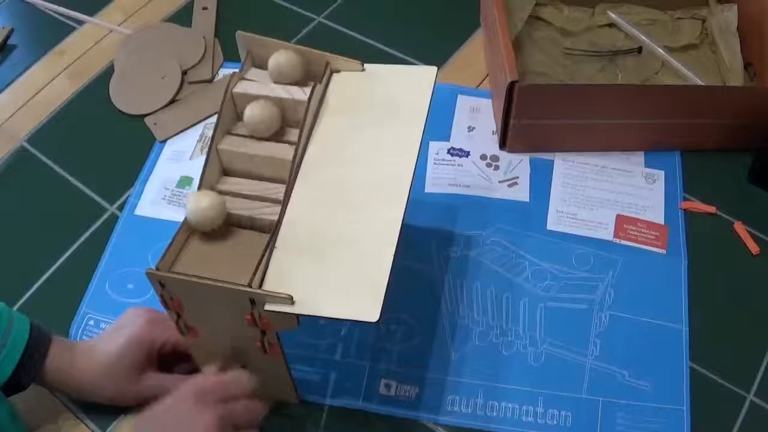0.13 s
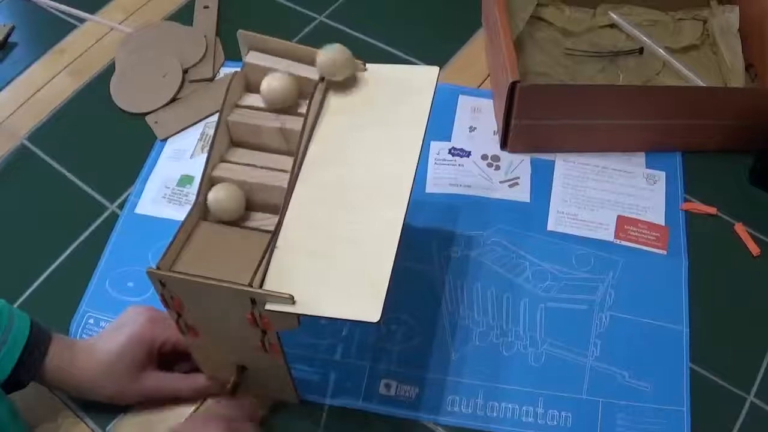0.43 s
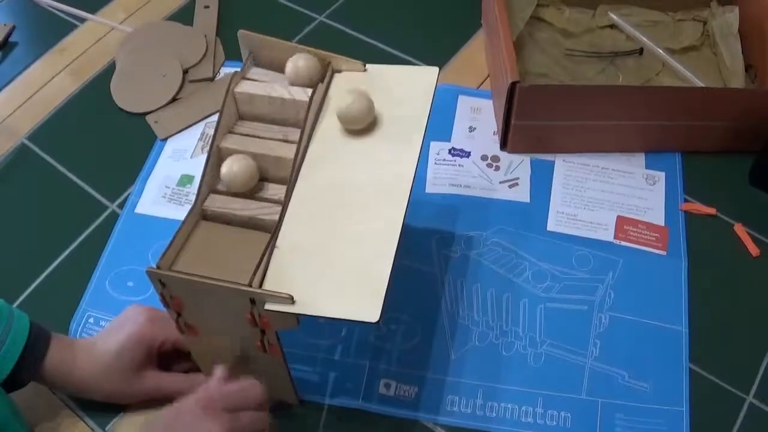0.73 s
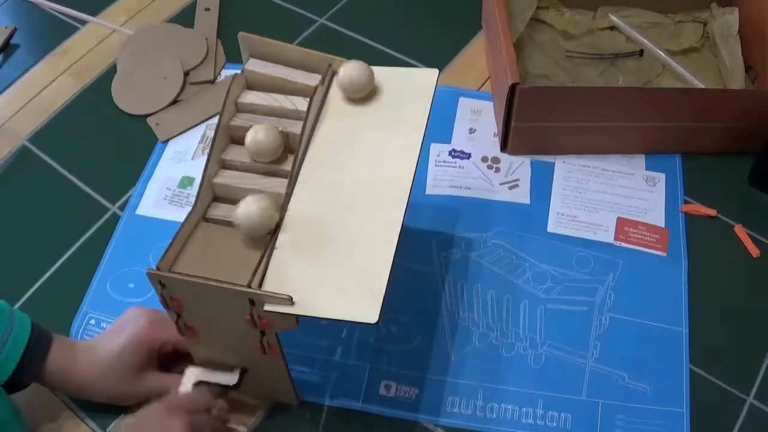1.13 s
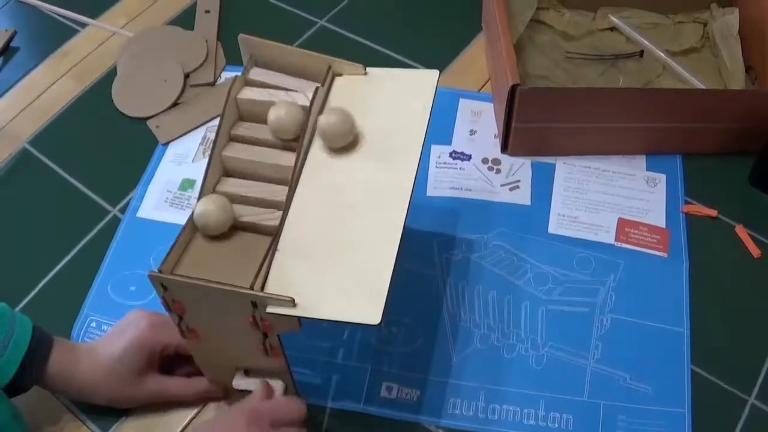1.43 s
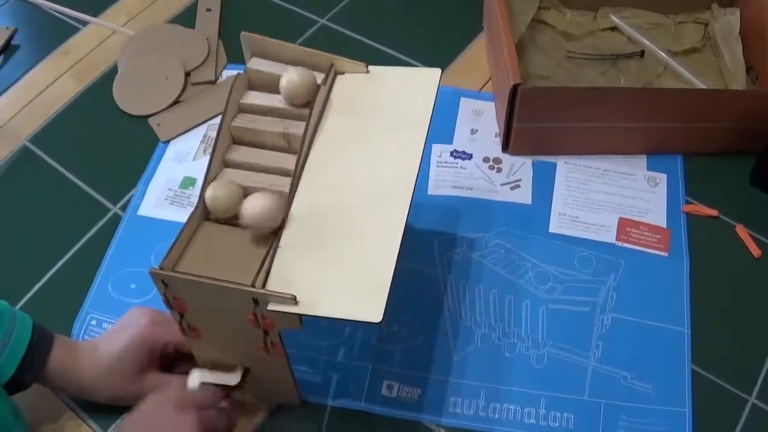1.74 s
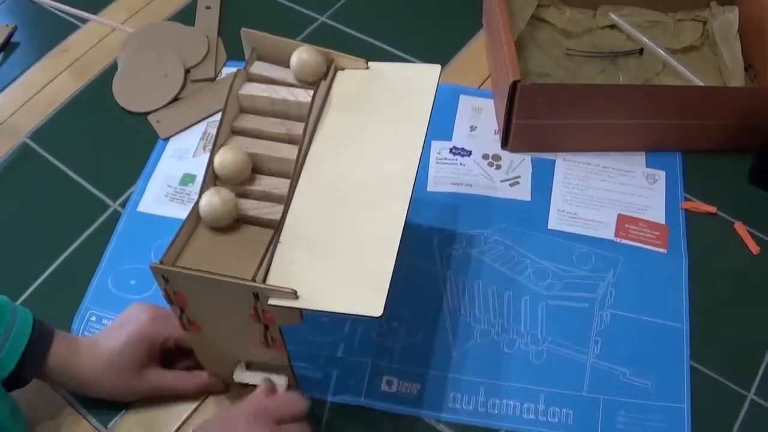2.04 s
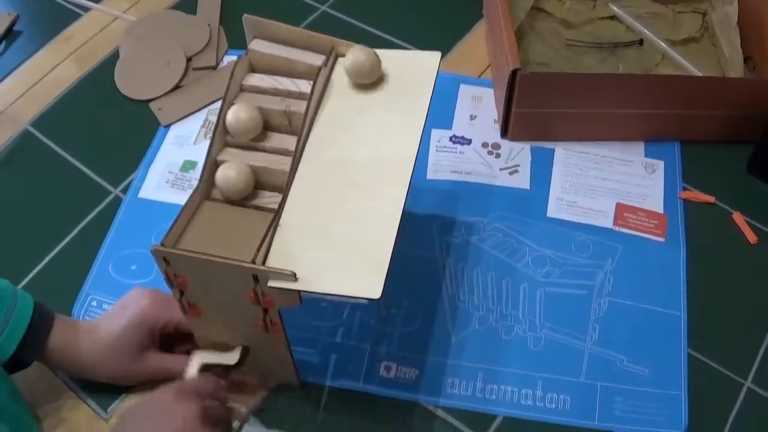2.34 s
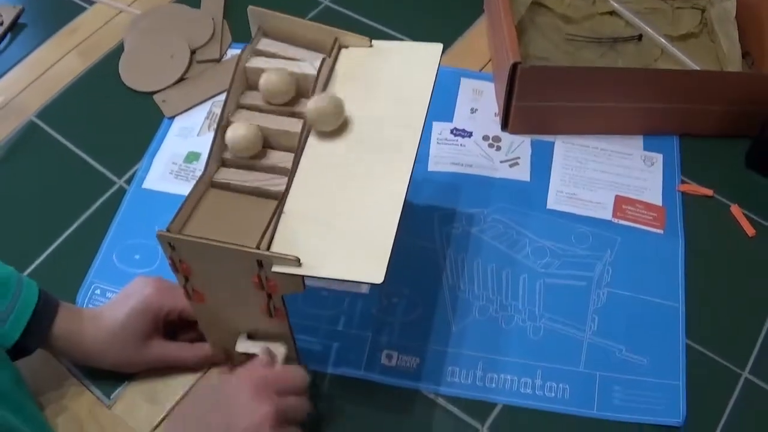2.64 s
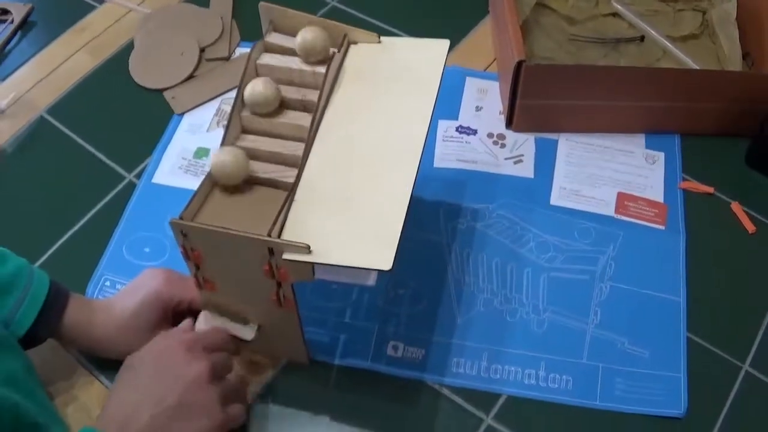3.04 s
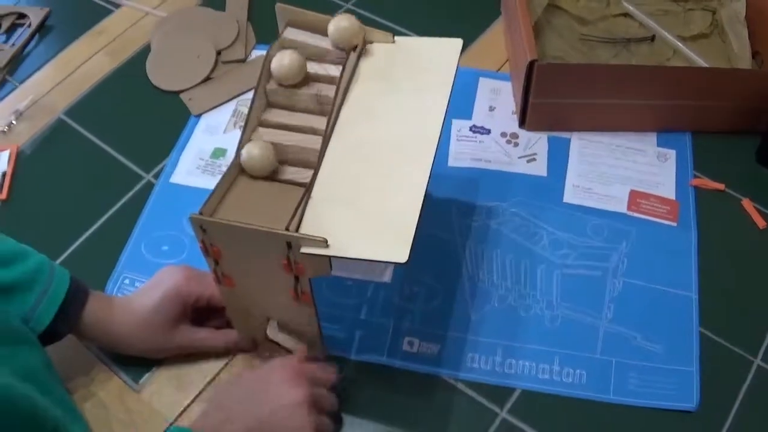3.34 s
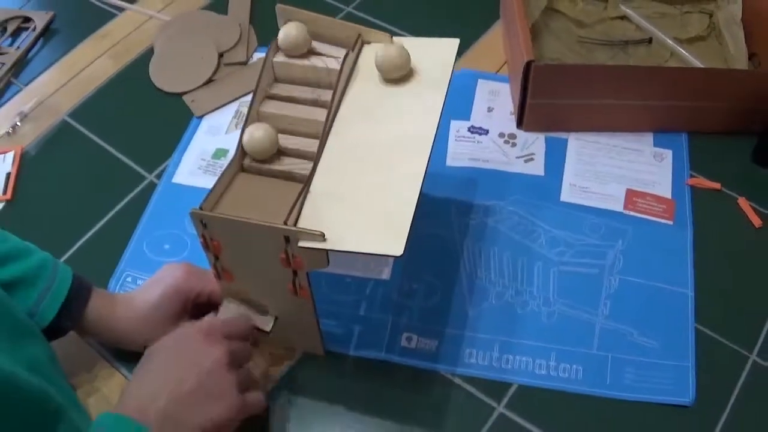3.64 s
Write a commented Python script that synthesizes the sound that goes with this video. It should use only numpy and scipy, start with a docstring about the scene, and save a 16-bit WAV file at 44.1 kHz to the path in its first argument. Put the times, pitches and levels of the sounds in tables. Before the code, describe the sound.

Hand-cranked wooden toy clatters close by, balls thudding and steps dropping in a quiet room

```python
"""Hand-cranked wooden ball stair

A plywood ball stair in a quiet room, heard from close by: balls bounce on a hollow ramp, steps drop
on their cams, balls clack against the frame and a peg ticks. Each blow sets damped sine modes ringing,
with noise for most contacts. Random taps make the rolling and rattles; the crank squeaks in thin glides.
A short noise wash gives the room, over banded stereo hiss, a low wavering hum and narrow drones."""
import sys
import numpy as np
from scipy import signal
from scipy.io import wavfile

SR = 44100
rng = np.random.default_rng(int(sys.argv[2]) if len(sys.argv) > 2 else 0)


def dump_mix(stems):
    """Bounce the given channels to the path in sys.argv[1] as a 16-bit WAV at rate SR."""
    frames = np.atleast_2d(stems).T  # one column per channel
    limited = np.clip(frames, -1, 1)  # hard clip at full scale
    pcm = np.round(limited * 32767).astype(np.int16)
    wavfile.write(sys.argv[1], SR, pcm)


N = 166698
FRAME_CRACK_HZ = 4170  # low edge of the contact noise of clacks and ticks

# Rolling and rubbing of balls and cams through the body: (time [s], level [dB])
ROLL_LEVEL = [(0.28, -44), (0.84, -43.5), (1.18, -42), (1.3, -35.5), (1.39, -35.5), (1.55, -42),
              (1.82, -38.5), (1.96, -33.5), (2.32, -44.5), (2.59, -40.5), (2.96, -37), (3.08, -30.5),
              (3.27, -39.5), (3.78, -38.5)]


def from_db(db):
    """Turn dB into gain."""
    return 10 ** (np.asarray(db) / 20)


def rms_one(x):
    """Scale to rms 1."""
    return x / np.sqrt(np.mean(x ** 2) + 1e-20)


def in_time(rows):
    """Read a level curve at every sample, straight in dB between its points."""
    s, db = np.transpose(rows)
    return np.interp(np.arange(N) / SR, s, db)


def at_hz(points, hz):
    """Read a spectrum on a log frequency axis."""
    point_hz, values = np.transpose(points)
    return np.interp(np.log(hz), np.log(point_hz), values)


def high_pass(x, order, hz):
    """Take away what lies below hz."""
    return signal.sosfilt(signal.butter(order, hz, "high", fs=SR, output="sos"), x)


def drift(rate_hz):
    """Slow random wander of spread 1: twice-smoothed noise, one point every 40 samples."""
    step, warm_up = 40, 2000
    r = np.exp(-2 * np.pi * rate_hz * step / SR)
    noise = rng.standard_normal(N // step + warm_up + 2)
    slow = signal.lfilter([1], [1, -2 * r, r * r], noise)[warm_up:]
    return np.interp(np.arange(N) / step, np.arange(len(slow)), rms_one(slow))


def decay_per_sample(t60):
    """Gain from one sample to the next that falls 60 dB in t60 seconds."""
    return from_db(-60 / (t60 * SR))


def dying(clicks, t60):
    """Each click starts an envelope at its own height that dies away."""
    return signal.lfilter([1], [1, -decay_per_sample(t60)], clicks + 1e-18)


def ring(clicks, hz, t60):
    """A damped resonance: a unit click sets a sine of height 1 ringing."""
    r, w = decay_per_sample(t60), 2 * np.pi * hz / SR
    return signal.lfilter([0, np.sin(w)], [1, -2 * r * np.cos(w), r * r], clicks + 1e-18)


def clicks_at(s, db):
    """Place one single-sample click per blow."""
    out = np.zeros(N)
    index = np.minimum((np.asarray(s) * SR).astype(int), N - 1)
    np.add.at(out, index, from_db(db))
    return out


def strike(s, db, modes, colour_db=lambda hz: 0):
    """Every blow, a click and a dying chatter of smaller contacts, rings each mode at its own strength."""
    spread_db, chatter_db, chatter_cycles = 1.5, -11, 16
    spread = spread_db * rng.standard_normal((len(s), len(modes)))
    out = np.zeros(N)
    for k, (hz, level_db, t60) in enumerate(modes):
        clicks = clicks_at(s, db + level_db + colour_db(hz) + spread[:, k])
        # chatter lasts a number of cycles, so low modes are fed for longer
        chatter_t60 = chatter_cycles / hz
        even_energy = np.sqrt(1 - decay_per_sample(chatter_t60) ** 2)
        chatter = even_energy * dying(clicks, chatter_t60) * rng.standard_normal(N)
        sign = -(-1) ** k  # neighbouring modes start in opposite directions
        out += sign * ring(clicks + from_db(chatter_db) * chatter, hz, t60)
    return out


def crack(s, db, low_hz):
    """The contact itself: treble noise that falls 60 dB in 12 ms."""
    return dying(clicks_at(s, db), 0.012) * high_pass(rng.standard_normal(N), 2, low_hz)


def bounces():
    """Balls bounce on the ramp: hollow thuds of its modes with a crack of contact noise."""
    # Ball bounces: (time [s], blow level [dB], crack over blow [dB])
    bounce_rows = [(0.1062, -4, -8.5), (0.1338, -14, -10), (0.2104, -11.5, -9), (0.2435, -14, -3),
                   (0.272, -17, -7), (1.2134, -1, -8.5), (1.2845, -3, -8), (1.366, -7.5, -3),
                   (1.4573, -13, -2.5), (1.4797, -14, -3.5), (1.5, -15, -5), (1.5186, -10.5, -22),
                   (1.7806, -7.5, -11), (1.8182, -0.5, -6.5), (1.8913, -3.5, -5.5), (1.9554, -11.5, -5),
                   (2.003, -5.5, -6.5), (2.0391, -9, -6), (2.0691, -13, -5), (2.0972, -12, -13),
                   (2.122, -12.5, -11), (2.9368, 2, -8), (3.0119, -3.5, -4.5), (3.0264, -4, -4.5),
                   (3.0737, -11, -7), (3.1262, -10.5, -4.5), (3.2423, -26, 7.5)]
    # Resonances of the hollow ramp: (frequency [Hz], level [dB], t60 [s])
    ramp_modes = [(348, -7.5, 0.014), (460, -23, 0.15), (508, -19, 0.14), (654, -4.5, 0.013),
                  (747, -10.5, 0.03), (873, -2, 0.023), (981, -1, 0.011), (1287, -11, 0.016),
                  (1796, -2.5, 0.01), (1987, -4.5, 0.012), (2970, -10, 0.0067)]
    ring_db, crack_low_hz = -7.5, 7560
    s, db, crack_db = np.transpose(bounce_rows)
    return strike(s, db + ring_db, ramp_modes) + crack(s, db + crack_db, crack_low_hz)


def drops():
    """Steps drop on their cams and rebound; the modes ring and are broken up by a shake on the guides."""
    # Step drops: (time [s], blow level [dB], crack and high modes [dB], low modes [dB])
    drop_rows = [(0.5096, -4.5, -5, 1.3), (.526, -11.5, -27, 8), (1.1238, -3, -6.5, 0.1),
                 (1.1484, -10, -12.5, 6), (1.173, -17.5, -11, 14), (1.532, -11.5, -28, 1),
                 (1.546, -10.5, -29, -12), (2.294, -2.5, -6.5, -1.5), (2.3113, -6, -16, 5.2),
                 (2.348, -16, -17, 4), (2.7, -9.5, -18, -17), (3.5069, -5, -4, 1), (3.525, -10, -22, 10),
                 (3.5434, -16.5, -10, 14.5)]
    # Resonances of the steps: (frequency [Hz], level [dB], t60 [s])
    step_modes = [(480.3, -14.5, .09), (518, -19.5, 0.031), (999, -13.5, 0.062), (1664, -4, 0.017),
                  (1738, -2, 0.027), (2087, -11, 0.032), (2519, -7.5, 0.023), (3030, -4.5, 0.016),
                  (4097, -1.5, 0.0077), (5067, 1, 0.0066), (6185, -4, 0.014)]
    ring_db, crack_low_hz = -6, 3770
    low_top_hz, high_from_hz = 1300, 2800
    taps_per_s, shake_t60_s, shake_db, bright_db = 600, 0.1, -8, 5.5
    s, db, crack_db, low_db = np.transpose(drop_rows)

    def colour_db(hz):
        """Set low modes by the blow; high modes need a hard contact."""
        if hz < low_top_hz:
            return low_db
        return crack_db if hz > high_from_hz else 0

    shake = dying(clicks_at(s, db + ring_db + shake_db), shake_t60_s)
    taps = shake * (rng.random(N) < taps_per_s / SR)
    rattle = np.zeros(N)
    for hz, level_db, t60 in step_modes:
        if hz < high_from_hz:
            rattle += ring(from_db(level_db) * taps * rng.standard_normal(N), hz, t60)
    # differencing leaves the treble of the bare taps
    bright = from_db(bright_db) * signal.lfilter([1, -1], [1], taps * rng.standard_normal(N))
    blows = strike(s, db + ring_db, step_modes, colour_db)
    return blows + crack(s, db + crack_db, crack_low_hz) + rattle + bright


def clacks():
    """Balls clack against the frame: short dry knocks, modes falling off from each knock's brightest pitch."""
    # Ball clacks: (time [s], blow level [dB], brightest pitch [Hz], thud over blow [dB], crack over blow [dB])
    clack_rows = [(0.1525, -20.5, 2740, -3, -13), (0.1672, -7, 2020, -6.5, -5),
                  (0.1823, -20, 2140, -1, -19), (0.2192, -16.5, 1180, -4, -29),
                  (0.319, -26.5, 1720, 2.5, -29), (0.3996, -27.5, 1380, 0, 2.5),
                  (0.497, -21, 1890, -19, -11), (0.744, -16, 2730, -38, -10),
                  (0.7558, -11.5, 2740, -1, 1.5), (0.7646, -12, 3050, -37, -20),
                  (0.786, -26, 1360, -10, -15), (0.8096, -33, 2240, -5, -13), (0.852, -24, 2440, 0, -26),
                  (0.9008, -14.5, 1980, -7, -30), (0.9174, -17, 1680, 0, -22),
                  (0.9339, -20.5, 1810, 0.5, -7.5), (1.0629, -18, 2360, -25, -10.5),
                  (1.3147, -15, 1170, 1, 2), (1.352, -15, 2250, -20, -12), (1.389, -30, 2180, 7, -16),
                  (1.4114, -25, 2600, 3, -26), (1.5871, -19, 3940, -5, -5.5),
                  (1.6906, -12, 2000, -30, -9.5), (1.9007, -25, 2730, -1, -2),
                  (1.9088, -14, 2100, -0.5, -3), (1.9229, -12, 2500, -1, 2.5),
                  (1.9758, -15, 2280, -10, -28), (2.2824, -29, 2300, -9, -17), (2.5452, -34, 1360, -16, -6),
                  (2.569, -11, 2850, -28, -35), (2.594, -32, 2640, -11, -12), (2.6112, -17, 1900, -23, -24),
                  (2.6176, -24.5, 2230, 8, -22), (2.678, -17, 1710, 3, -21), (2.698, -8, 2370, -0.5, -10),
                  (2.8946, -10.5, 2950, -2.5, -10.5), (2.9071, -36.5, 3140, 20, -16),
                  (3.1025, -13, 2400, -18, -16), (3.1411, -15.5, 2800, -23, 9.5),
                  (3.1583, -8.5, 2600, -5, -2), (3.1995, -16.5, 2170, -1.5, -9),
                  (3.2275, -20, 1820, 2, -23), (3.7458, -23, 1630, 0, -22), (3.7699, -8, 2020, -21, -5.5)]
    # Upper resonances of the frame: (frequency [Hz], level [dB], t60 [s])
    knock_modes = [(1380, 7.5, 0.011), (1720, 2.6, 0.02), (1930, 5.7, 0.015), (2280, 6.2, 0.009),
                   (2546, 2.5, 0.02), (2937, 6.4, 0.0068), (3250, 0.7, 0.027), (3705, 9, 0.0056),
                   (4470, -4, 0.015)]
    # Low resonances of the frame: (frequency [Hz], level [dB], t60 [s])
    thud_modes = [(335, -12, 0.029), (628, -2.5, 0.045), (840, -7.5, 0.058), (1076, -5.5, 0.042)]
    ring_db, thud_ring_db, fall_db_per_octave = -8, -8, 10
    s, db, bright_hz, thud_db, crack_db = np.transpose(clack_rows)

    def colour_db(hz):
        """Weaken a mode by its distance in octaves from the brightest pitch."""
        return -fall_db_per_octave * np.abs(np.log2(hz / bright_hz))

    knocks = strike(s, db + ring_db, knock_modes, colour_db)
    thuds = strike(s, db + thud_db + thud_ring_db, thud_modes)
    return knocks + thuds + crack(s, db + crack_db, FRAME_CRACK_HZ)


def ticks():
    """A hard peg ticks: one high ring, a dry lower snap and a crack of contact noise."""
    # Peg ticks: (time [s], ring level [dB], ring pitch [Hz], snap over ring [dB], crack over ring [dB])
    tick_rows = [(0.4143, -14.5, 3460, -4, -11), (.4241, -21.5, 3400, 0.5, -16),
                 (1.5975, -9, 3470, -7, -20), (1.6099, -17.5, 3500, -2, -5.5),
                 (1.7018, -17.5, 3050, -15, -24), (2.1624, -14, 3500, 2.5, -5.5),
                 (2.1847, -19, 3490, -1, -5), (2.2393, -11, 3310, 2.5, -35), (2.852, -13.5, 3320, 6.5, -37),
                 (2.913, -34, 3130, -9, -30), (3.4007, -9, 3530, -3, -12.5), (3.4143, -12, 3450, -6, -10),
                 (3.4973, -13, 3030, 6, -15)]
    ring_t60_s, snap_hz, snap_t60_s = 0.022, 2300, 0.004
    s, db, hz, snap_db, crack_db = np.transpose(tick_rows)
    rings = np.zeros(N)
    for tick_s, tick_db, tick_hz in zip(s, db, hz):
        rings += ring(clicks_at([tick_s], tick_db), tick_hz, ring_t60_s)
    snaps = ring(clicks_at(s, db + snap_db), snap_hz, snap_t60_s)
    return rings - snaps + crack(s, db + crack_db, FRAME_CRACK_HZ)


def rolling():
    """Balls and cams roll and rub: dense uneven contacts, dealt at random among the body's modes."""
    # Resonances of the body: (frequency [Hz], level [dB], t60 [s])
    body_modes = [(245, -9, 0.08), (296, 5, 0.23), (363, -6, 0.45), (454.7, 5.5, 0.045), (549, -2, 0.054),
                  (616.6, 2.5, 0.074), (743, 2.5, 0.15), (816, -12, 0.087), (1015, -18, .08),
                  (965, -17.5, 0.04), (1449, -2, 0.017), (1720, -14.5, 0.044), (1970, -3.5, 0.017),
                  (2500, -19.5, 0.017)]
    contacts_per_s, level_db = 125 * len(body_modes), -1
    sizes = from_db(2.7 * np.minimum(rng.exponential(1, N), 5)) * rng.choice([-1, 1], N)
    chance = contacts_per_s / SR * from_db(3 * drift(8))  # crowds and thins out
    contacts = sizes * (rng.random(N) < chance)
    dealt = rng.integers(0, len(body_modes), N)
    body = np.zeros(N)
    for k, (hz, db, t60) in enumerate(body_modes):
        body += from_db(db) * rms_one(ring(contacts * (dealt == k), hz, t60))
    return from_db(in_time(ROLL_LEVEL) + level_db) * rms_one(body)


def grit():
    """Loose parts rattle with the rolling: sparse short taps, dealt among twelve pitches."""
    taps_per_s, level_db, ring_cycles = 400, -7, 7.7
    pitches = np.geomspace(515, 5050, num=12)  # Hz
    sizes = from_db(4.5 * np.minimum(rng.exponential(1, N), 4)) * rng.choice([-1, 1], N)
    chance = taps_per_s / SR * from_db(5 * drift(12))
    contacts = sizes * (rng.random(N) < chance)
    dealt = rng.integers(0, len(pitches), N)
    taps = np.zeros(N)
    for k, hz in enumerate(pitches):
        taps += ring(contacts * (dealt == k), hz, ring_cycles / hz)
    return from_db(in_time(ROLL_LEVEL) + level_db) * rms_one(taps)


def squeaks():
    """The crank squeaks faintly: thin sine glides, roughened by fast wander of pitch and level."""
    # Squeaks: (time [s], length [s], start pitch [Hz], end pitch [Hz], level [dB])
    squeak_rows = [(.345, .04, 4500, 4800, -49), (.955, .035, 4800, 5600, -50),
                   (1.25, .04, 6000, 6100, -51), (2.5, .05, 6000, 5950, -50), (3.33, .06, 4500, 4800, -46)]
    out = np.zeros(N)
    for s, length, start_hz, end_hz, db in squeak_rows:
        n, i = int(length * SR), int(s * SR)
        hz = np.linspace(start_hz, end_hz, n) * (1 + 0.015 * drift(150)[:n])
        swell = np.hanning(n) * drift(250)[:n]
        out[i:i + n] += from_db(db) * swell * np.sin(2 * np.pi * np.cumsum(hz) / SR)
    return out


def room(x):
    """The room answers with a dying, dulled noise wash of reflections, mostly alike on both sides."""
    t60_s, level_db, cut_hz, width, onset_s = 0.24, -7, 6000, 0.42, 0.0077
    t = np.arange(SR // 2) / SR
    wash = rng.standard_normal((2, len(t))) * from_db(-60 * t / t60_s) * np.minimum(t / onset_s, 1)
    dulled = signal.lfilter(*signal.butter(1, cut_hz, fs=SR), wash)
    mid, side = dulled / np.sqrt(np.sum(wash[0] ** 2))
    stereo = mid + width * side * [[1], [-1]]
    return from_db(level_db) * signal.fftconvolve(x[None], stereo, axes=1)[:, :N]


def hiss():
    """The room hisses: half-octave bands of stereo noise, each with its own flicker and likeness."""
    # Course of the hiss before its overall lift: (time [s], level [dB])
    hiss_level = [(0.3, -45), (0.61, -45.5), (0.98, -43), (1.11, -45), (1.24, -39.5), (1.37, -46),
                  (1.53, -43.5), (2.03, -39.5), (2.77, -41), (3.09, -39.5), (3.34, -39.5), (3.78, -40)]
    # Relative spectrum of the hiss: (frequency [Hz], density [dB per Hz])
    hiss_colour = [(15, -59), (25, -29), (138, -8.5), (165, -11), (303, -6.5), (559, -23.5), (721, -0.5),
                   (1140, -17), (1230, -9), (3410, -18), (4510, -19.5), (11000, -18.5), (14300, -17),
                   (22000, -120)]
    # How alike left and right are: (frequency [Hz], likeness [1 = the same])
    likeness = [(60, 0.96), (170, 0.91), (490, 1), (1420, 0.65), (4080, 0.64), (11700, 0.88)]
    lift_db, flicker_db, flicker_hz = 3.5, 3, 6.8
    edges = 22 * 2 ** np.arange(0, 9.6, 0.5)
    white = rng.standard_normal((2, 2, N))  # neighbouring bands draw on different noise
    out = np.zeros((2, N))
    for k, (low, high) in enumerate(zip(edges, edges[1:])):
        band = signal.butter(2, [low, high], "band", fs=SR, output="sos")
        mid, side = signal.sosfilt(band, white[k % 2])
        hz = np.sqrt(low * high)
        alike = np.clip(at_hz(likeness, hz), -1, 1)
        stereo = np.sqrt(1 + alike) * mid + np.sqrt(1 - alike) * side * [[1], [-1]]
        out += from_db(at_hz(hiss_colour, hz) + flicker_db * drift(flicker_hz)) * stereo
    return from_db(in_time(hiss_level) + lift_db) * rms_one(out)


def hum():
    """A low sine wavers in pitch and level, over steady drones of noise in narrow resonances."""
    # Course of the hum: (time [s], level [dB])
    hum_level = [(0.12, -61.5), (0.44, -48), (1.08, -62), (1.26, -47), (1.56, -49), (1.59, -59.5),
                 (1.87, -44), (2.04, -61), (2.08, -44), (2.54, -55.5), (2.62, -45), (2.71, -60.5),
                 (3.09, -46), (3.45, -55.5), (3.58, -40), (3.68, -81), (3.73, -54), (3.78, -54)]
    # Narrow tones of the room: (frequency [Hz], width [Hz], level [dB])
    drone_rows = [(307.7, 17, -53.5), (327.4, 21, -54), (728, 16, -47.5)]
    hz = 136.5 + 2.46 * drift(4.7)
    tone = np.sqrt(2) * np.sin(2 * np.pi * np.cumsum(hz) / SR)
    drones = np.zeros(N)
    for drone_hz, width_hz, db in drone_rows:
        t60 = np.log(1000) / (np.pi * width_hz)
        drones += from_db(db) * rms_one(ring(rng.standard_normal(N), drone_hz, t60))
    return from_db(in_time(hum_level)) * tone + drones


def scene():
    """Sum the toy, its peg and the room, leaning a little to the left."""
    body_low_hz, peg_to_room_db, left_db = 259, -4, 0.6
    toy = bounces() + drops() + clacks() + rolling() + grit() + squeaks()
    toy = high_pass(toy, 4, body_low_hz)  # the small box sends out no bass
    peg = ticks()
    # the peg faces the microphone and stirs the room less
    reflections = room(toy + from_db(peg_to_room_db) * peg)
    return (toy + peg + reflections + hiss() + hum()) * from_db([[left_db], [-left_db]])


def record(dry):
    """Round the peaks, fade in just after the start and cut the top steeply."""
    start_s, fade_s, overload = 0.081, 0.0053, 1.1
    opened = np.clip((np.arange(N) / SR - start_s) / fade_s, 0, 1)
    rounded = overload * np.tanh(dry / overload) * opened
    softened = signal.sosfilt(signal.butter(8, 12250, fs=SR, output="sos"), rounded)
    return signal.sosfilt(signal.cheby2(14, 40, 11350, fs=SR, output="sos"), softened)


dry = scene()
out = record(dry)
dump_mix(out)
```